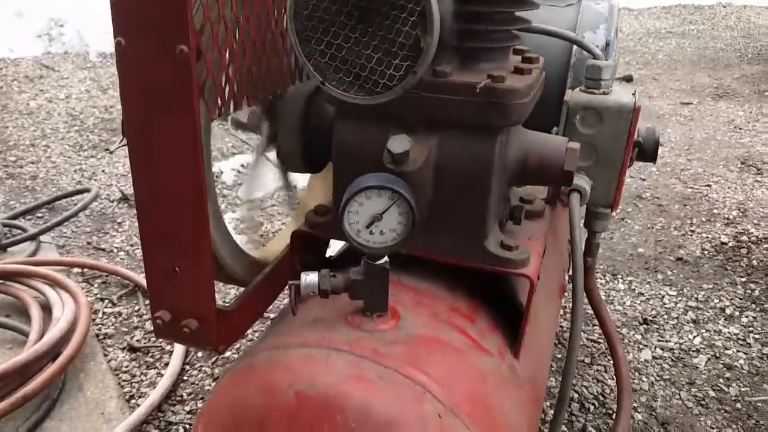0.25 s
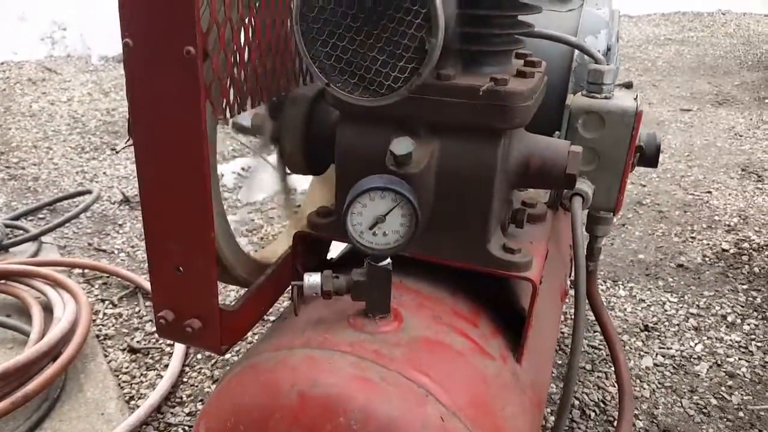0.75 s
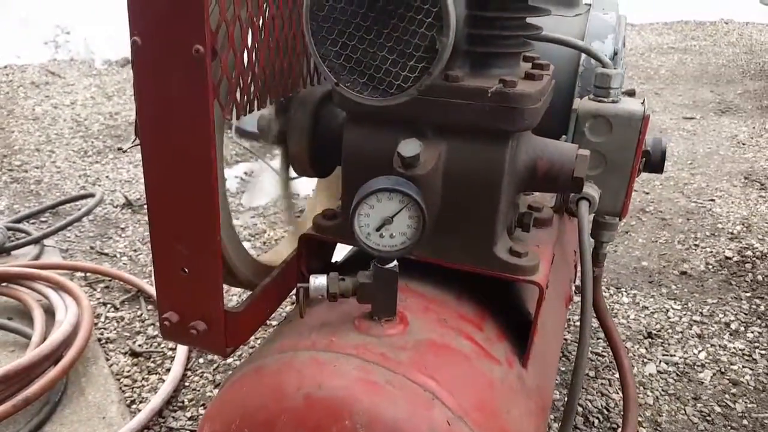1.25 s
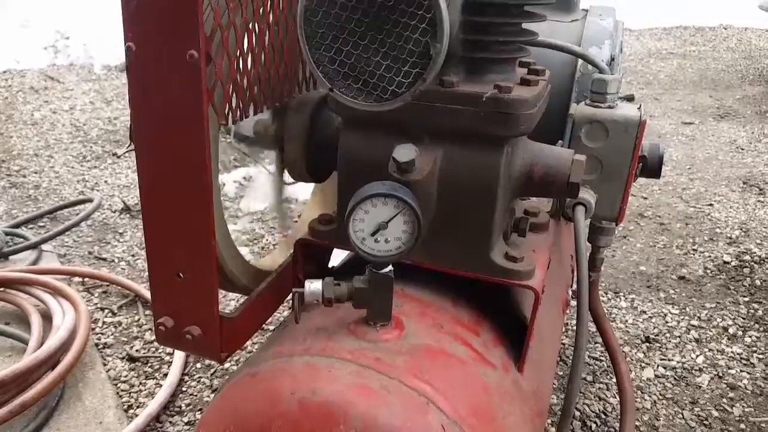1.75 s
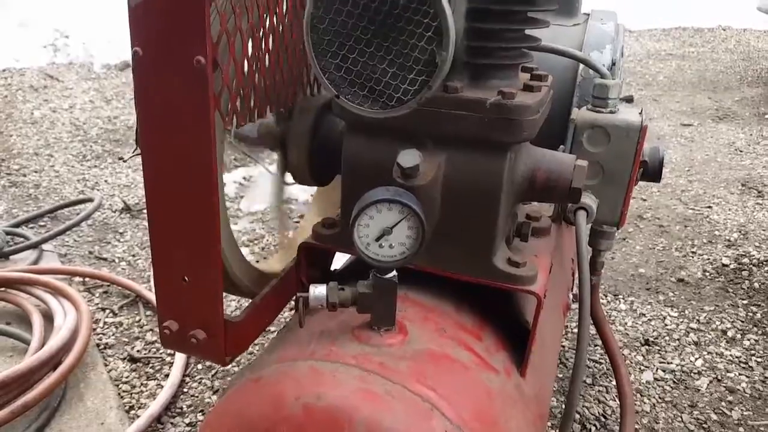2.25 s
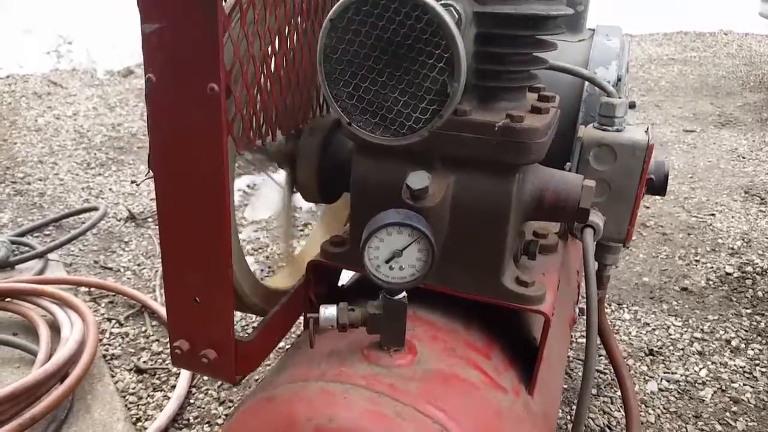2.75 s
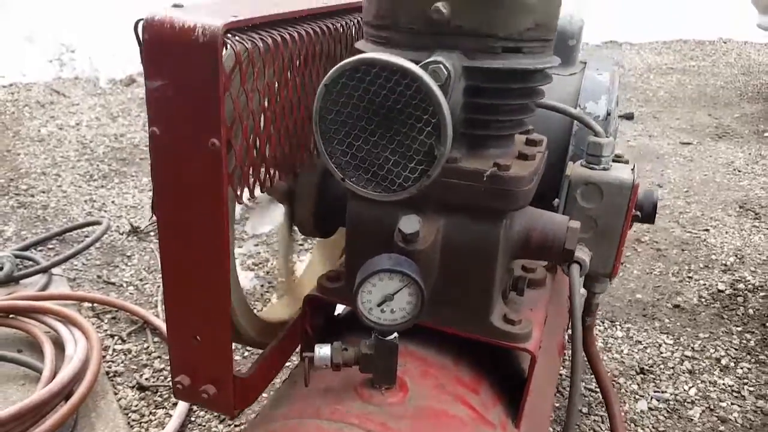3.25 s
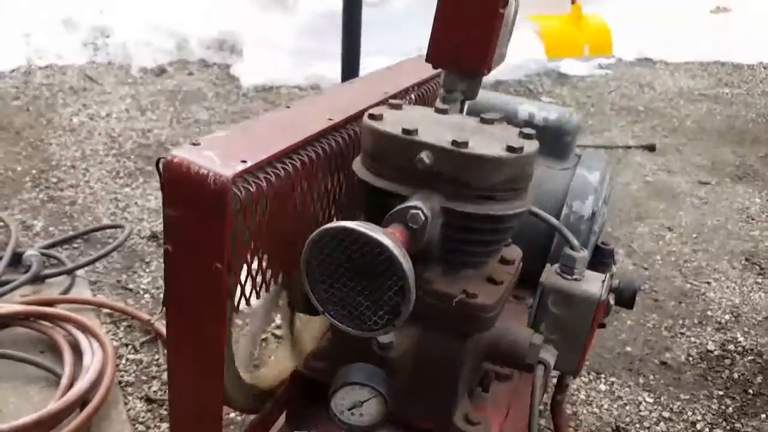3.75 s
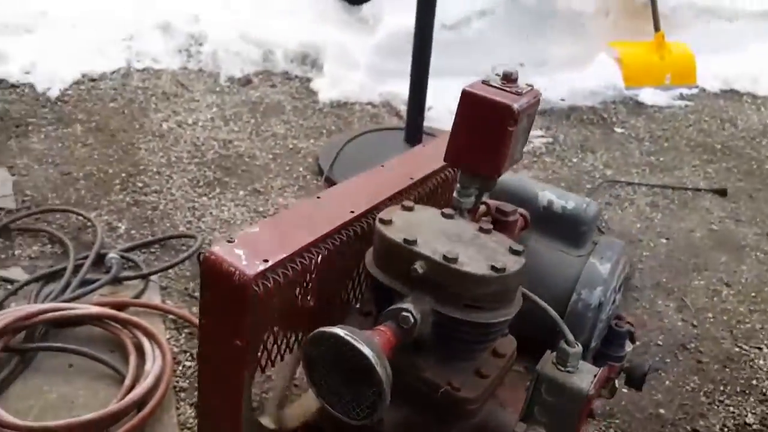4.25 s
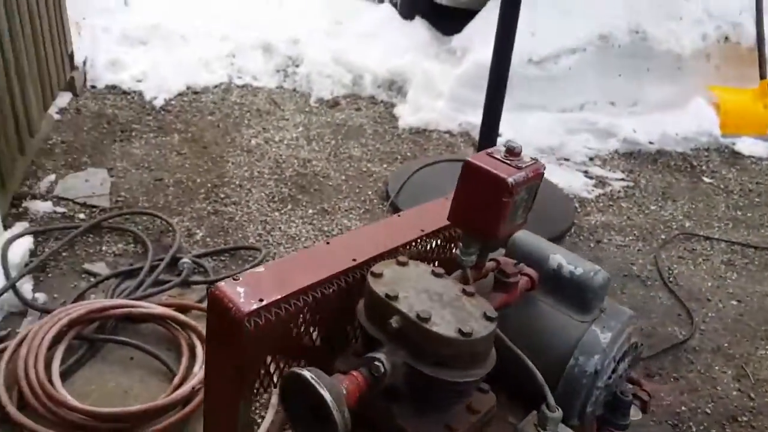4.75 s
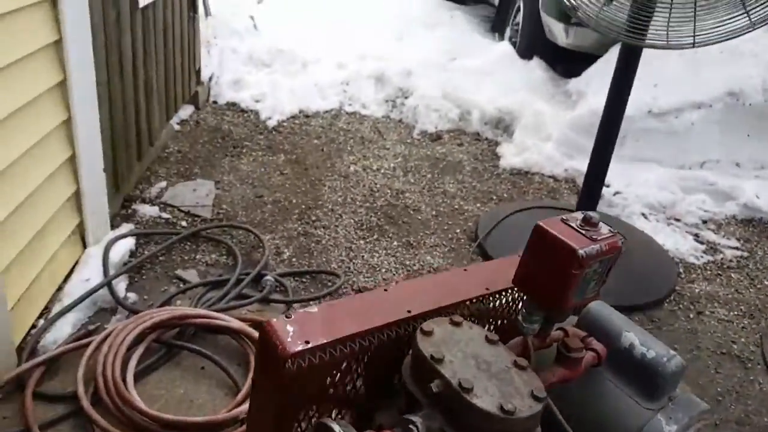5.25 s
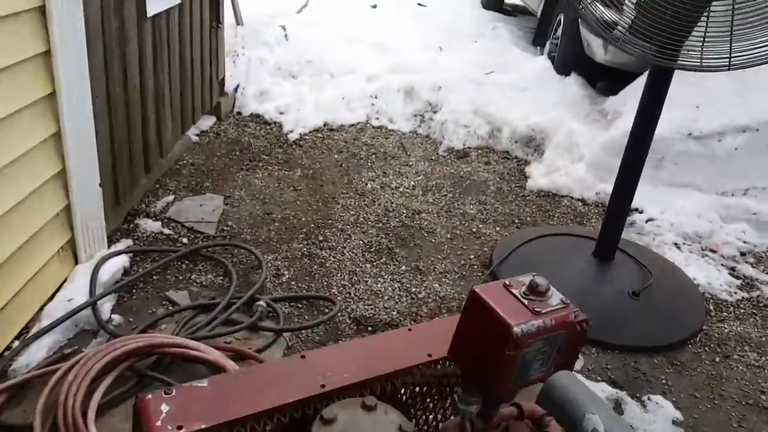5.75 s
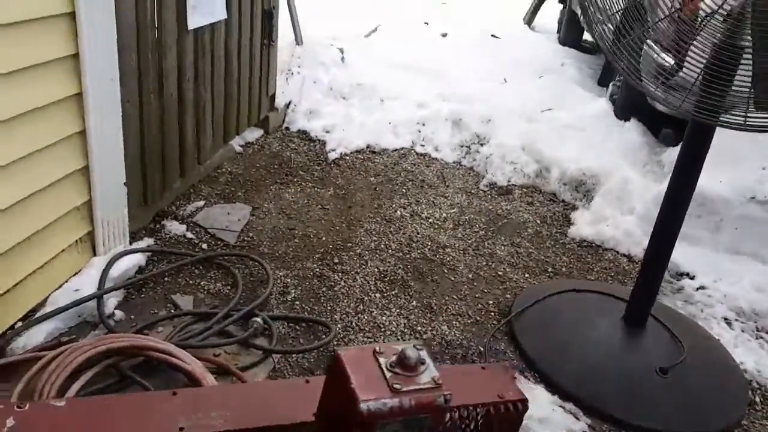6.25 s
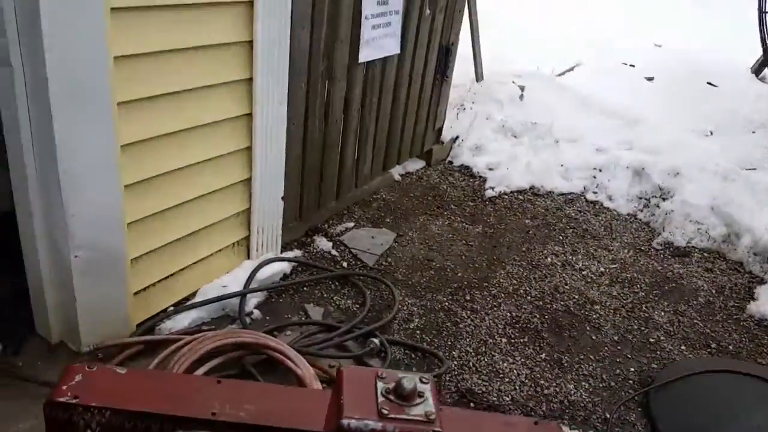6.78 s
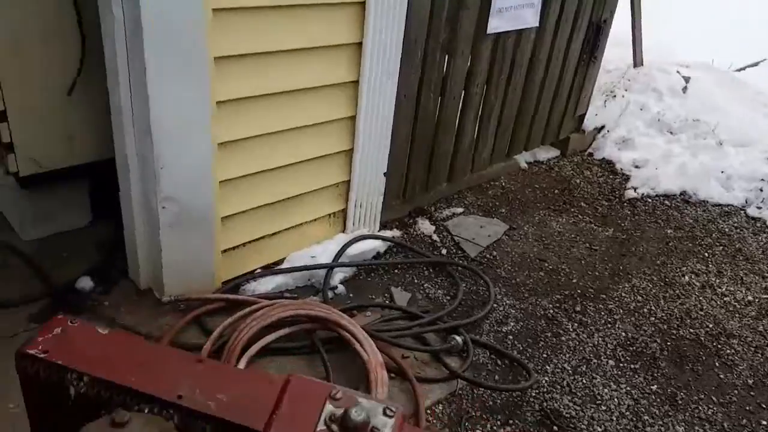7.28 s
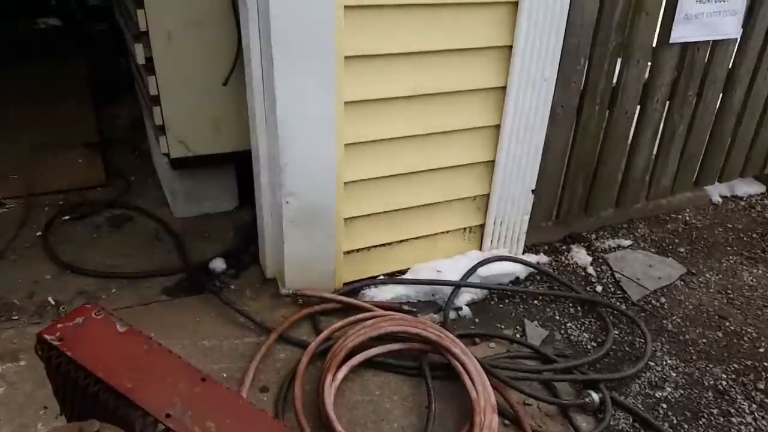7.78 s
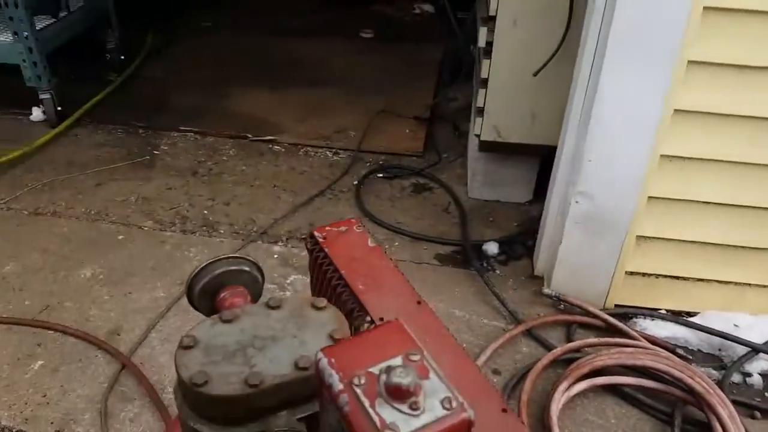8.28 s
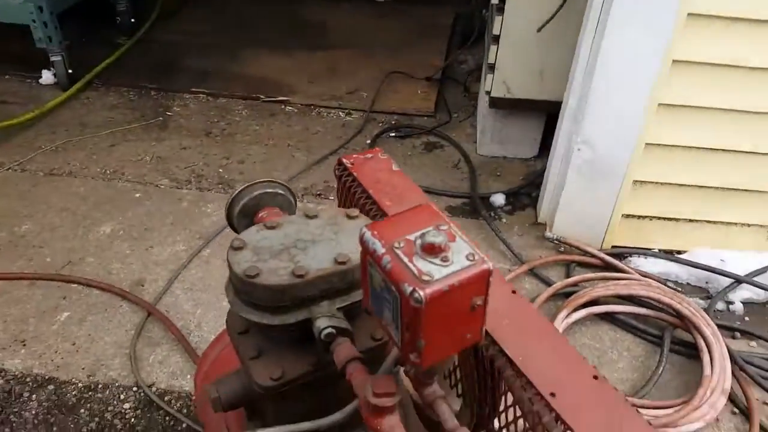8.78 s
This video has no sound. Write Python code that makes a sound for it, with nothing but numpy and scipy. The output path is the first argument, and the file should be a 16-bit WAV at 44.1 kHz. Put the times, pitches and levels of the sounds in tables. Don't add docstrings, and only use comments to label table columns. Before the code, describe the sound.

A two-cylinder belt-driven air compressor runs at an unchanging fast pace outdoors on gravel. Each intake stroke makes a low raspy flutter, about 24 a second, over ringing tank and guard steel and pulsing air hiss. A loose part ticks irregularly. Close stereo microphones circle the machine, so the buzz softens and the metallic colour shifts, with two soft footfalls in the second half.

```python
import sys
import numpy as np
from scipy import signal
from scipy.io import wavfile
from scipy.ndimage import uniform_filter1d

SR = 44100
rng = np.random.default_rng(int(sys.argv[2]) if len(sys.argv) > 2 else 0)


def store_pcm(level_fs):
    pcm = np.round(np.clip(level_fs, -1, 1) * 32767).astype(np.int16)
    wavfile.write(sys.argv[1], SR, np.atleast_2d(pcm).T)


def nominal_scale(level):
    x = np.asarray(level, float) / 20
    return 10 ** x


N = 397782

CRANK_PER_S, FIRST_STROKE_S = 11.9595, .0285

# flutter at valve opening f/Hz, glide/(Hz/s), level/dB, head start/flutter cycles
CYLINDERS = [(174, 450, -1, .43), (189.5, 130, 0, .365)]
# t after opening/s, level/dB
VALVE_LIFT = [(0, -22), (.0035, -6), (.014, 0), (.027, -1.5), (.034, -6), (.0415, -26)]
FADE_DB_PER_S = [40, 220, 400, 300]
# f/Hz, width/Hz, level/dB
TANK_FLANK_MODES = [(741, 3, 0), (963, 4, 2), (1006, 8, -6), (1045, 14, -3), (1157, 8, -6), (1050, 300, 1)]
# f/Hz, width/Hz, level/dB
TANK_TOP_MODES = [(1356, 5, -4), (1378, 6, -4), (1399, 4, 1), (1400, 120, -3), (1520, 70, -6),
                  (1640, 90, -3), (1771, 60, -8), (1927, 6, -6)]
# f/Hz, width/Hz, level/dB
GUARD_LOW_MODES = [(2164, 6, -1), (2128, 30, -3), (2195, 40, -3), (2660, 30, -5), (2756, 8, -7),
                   (2976, 25, -13)]
# f/Hz, width/Hz, level/dB
GUARD_HIGH_MODES = [(2305, 40, -6), (2391, 6, -2), (2435, 10, -5), (2460, 6, -1), (2524, 14, -5),
                    (2557, 8, -7), (2430, 110, 3)]
# f/Hz, width/Hz, level/dB
FIN_MODES = [(5600, 45, -6.5), (5935, 31, -4.5), (6235, 43, -1), (6507, 80, -0.5), (6134, 220, 2.5),
             (7310, 76, -8.5), (8010, 60, -11.5)]
# f/Hz, width/Hz, level/dB
HEAD_MODES = [(707, 4, -3), (600, 40, -2)]
# f/Hz, width/Hz, level/dB
SHEEN_MODES = [(12700, 350, -1), (15650, 200, -3), (13800, 900, 0)]
# f/Hz, level/(dB per Hz)
AIR_SPECTRUM = [(1650, -24), (2800, -2), (3050, 2), (3150, -5.5), (3310, -4.5), (4040, -4.5), (4360, -8),
                (5320, -10), (5600, -15), (7280, -40), (12300, -120)]
# f/Hz, level/(dB per Hz)
LEAK_SPECTRUM = [(3940, -50), (6700, 2), (6980, 0.5), (7890, -1.5), (9000, -7.5), (9620, -32), (10300, -50),
                 (13400, -61), (22000, -120)]
# f/Hz, level/(dB per Hz)
TOP_SPECTRUM = [(6060, -28), (10300, -6.5), (10700, -1.5), (12200, -2), (13100, -4), (14200, -9.5),
                (15700, -16)]
# f/Hz, level/(dB per Hz)
FRAME_SPECTRUM = [(25, -32), (60, -18), (110, -46), (300, 2.5), (620, -6.5), (860, -9.5), (1250, -4),
                  (1650, 1), (1850, -7), (2300, 4.3), (2850, -67), (3300, -16)]
# multiple of crank speed, level/dB
PISTON_SHAKE = [(4, -80), (5, -46), (6, -54), (8, -56), (10, -38)]
# t/s, ring level/dB, snap level/dB
TICKS = [(.378, -24.5, -34), (.8844, -27, -55), (0.9727, -25, -59), (1.1767, -26, -38), (1.3962, -28, -55),
         (1.6347, -23, -41), (1.8118, -26, -55), (2.0118, -29, -55), (2.3037, -24, -55), (2.393, -27, -55),
         (2.845, -27, -55), (3.15, -25, -55), (3.2286, -28, -55), (3.764, -23.5, -37), (4.2248, -27, -42),
         (4.6818, -27, -38), (4.9831, -23, -55), (5.0614, -25, -55), (5.2669, -24, -36), (5.685, -22, -33),
         (6.6468, -26, -37), (6.7351, -29, -43), (6.8229, -30, -55), (7.2779, -39, -36), (7.4395, -23, -34),
         (7.857, -21, -35), (8.4047, -25, -55), (8.7006, -17, -51), (8.7914, -25, -57), (8.992, -25, -37)]
# t/s, peak level/dB, f/Hz
FOOTFALLS = [
    (4.642, -25, 105),
    (6.16, -29, 65),
]
# t/s, inlet level/dB, ground echo delay/ms, turned away/0-1
WALK = [(0, -24.5, 2.045, 0), (2.4, -24.5, 2.05, 0), (3.3, -25, 1.98, 0.02), (3.7, -26.5, 2.07, 0.07),
        (4.2, -27, 2.48, 0), (4.5, -27.5, 2.47, 0.03), (4.8, -29, 2, 0.14), (5.1, -26.5, 2.31, 0.07),
        (5.4, -27, 2.22, 0.14), (6, -25, 2.45, 0.38), (6.3, -27, 2.45, .6), (6.6, -29.5, 2.08, 0.53),
        (6.9, -30.5, 2.02, 0.93), (7.2, -28.5, 2.06, 0.78), (7.8, -30, 2.2, 0.88), (8.1, -28.5, 2.24, 0.48),
        (8.4, -28, 1.9, 0.25), (9, -31, 1.64, 0.17)]
# t/s, flank level/dB, top level/dB, guard level/dB, guard left-right/dB, guard left lead/rad
FACING = [(0, 3.5, -0.5, 1.5, 3, -1), (1.8, -1, 0, 0.5, 1, -.9), (3.3, 2.5, 0, 1.5, 3.5, -1.3),
          (4.3, 0, 3.5, -2, 3, -1), (4.8, -1.5, 3.5, 2.5, 5, -0.3), (5.1, -11, -3, 2.5, 5, -2),
          (5.6, -2, 0.5, 6, -5, -2.5), (5.8, 2.5, 2.5, 1.5, 8, -3.5), (6.1, -1, 7, 8, -2, -7.5),
          (6.5, 2.5, 6, 8.5, -1, -5.5), (6.8, 3, 4.5, 9, 4, -6.5), (7, 1.5, 0, 12, -7, -5),
          (7.4, 5.5, 6, 2, 5, -5), (7.8, 3.5, 6.5, 9, 4, -2.5), (8, 9, 5, 2, -2, -4.5),
          (8.2, 5.5, 0.5, 8, 13, -3), (8.6, 3.5, -1.5, 6, -4.5, -2.5), (9, 2.5, 0.5, 7, 1, -2.5)]
# t/s, level/dB
FINS_IN_VIEW = [(0, -1), (3.6, -.5), (5.3, 1.5), (5.5, 5), (6.3, 2), (6.7, -1.5), (7.8, 0), (9, -0.5)]

BUZZ_DB, ECHO_GAIN, FLUTTER_HZ = [0.5, 5.5, -4, -18], 0.76, 186.3
INLET_PAN_DB, INLET_LEAD_MS = (1.5, 1.5), (0.12, 0.25)
# level/dB, added when turned away/dB, left-right/dB, left lead/rad, added when turned away/rad
TANK_FLANK_AT, TANK_TOP_AT = (-34, 1.5, 1, 0.03, 1.95), (-23.5, -3, 5.5, 0.96, 2.5)
GUARD_LOW_DB, GUARD_LOW_PAN_DB, GUARD_HIGH_DB = -24.5, 7, -23.5
OVER_EDGE_RAD, HIDDEN_DB_PER_RAD = 3.3, 4
# level/dB, added when turned away/dB, left-right/dB, added when turned away/dB
AIR_AT, FIN_AT = (-35, -1.5, 2, -1.5), (-33.5, 2.5, 5, 2.5)
LEAK_AT, TOP_AT = (-36.5, 0, 1.7, 4), (-52.5, 6, 6, 14)
AIR_RISE_DB_PER_S = 0.7
SHEEN_DB, SHEEN_FOLLOWS = -53.5, 2.8
VALVE_DB, FRAME_DB = -44, -23.5
STRANDS_DB = 2.5
TICK_PAN_DB, TICK_SCATTER_DB, FAINT_PER_S, FAINT_DB = 3, 11, 2.5, -34


def evened(x):
    return x / np.sqrt(np.mean(abs(x) ** 2) + 1e-20)


def curves(rows):
    s, *columns = np.transpose(rows)
    return [np.interp(np.arange(N) / SR, s, c) for c in columns]


def sides(pan_db):
    ratio = nominal_scale(pan_db) ** 2
    left = ratio / (1 + ratio)
    return np.sqrt(2 * np.array([left, 1 - left])).reshape(2, -1)


def wander(depth_db, per_s):
    t = np.arange(0, N + 512, 512) / SR
    rates_hz = np.geomspace(per_s / 15, per_s, 16)
    drift = sum(np.sin(2 * np.pi * (f * t + rng.random())) / np.sqrt(f) for f in rates_hz)
    return np.interp(np.arange(N) / SR, t, nominal_scale(depth_db * evened(drift)))


def since_stroke():
    strokes = (np.arange(N) / SR - FIRST_STROKE_S) * 2 * CRANK_PER_S + 2
    return strokes.astype(int), strokes % 1 / (2 * CRANK_PER_S)


def throb(depth_db, late_s):
    stroke, s = since_stroke()
    force = 1 + .35 * rng.standard_normal(stroke[-1] + 1)[stroke]
    return nominal_scale(depth_db * force * np.cos(4 * np.pi * CRANK_PER_S * (s - late_s)))


def clatter(repeat, same):
    place = (np.arange(N) % (SR / CRANK_PER_S)).astype(int)
    walk_rad_per_s = np.interp(np.arange(N) / SR, [0, 3, 4, 9], [0.087, 0.063, 0.89, 0.77])
    view = np.cumsum(walk_rad_per_s) / SR
    early, late = rng.standard_normal((2, 2, 4000))[:, :, place]
    recurring = np.cos(view) * early + np.sin(view) * late
    a, b = np.sqrt(repeat) * recurring + np.sqrt(1 - repeat) * rng.standard_normal((2, N))
    return np.array([a, same * a + np.sqrt(1 - same ** 2) * b])


def inlet_db():
    level_db, echo_ms, _ = curves(WALK)
    out = []
    for k, db in enumerate(BUZZ_DB, 1):
        echo = ECHO_GAIN * np.exp(2j * np.pi * FLUTTER_HZ * k * echo_ms / 1000)
        out.append(level_db + db + 20 * np.log10(abs(1 - echo)))
    return out


def placed(level_db, away_db, pan_db, away_pan_db):
    away = curves(WALK)[2]
    return level_db + away_db * away, pan_db + away_pan_db * away


def later_right(x):
    lead_ms = INLET_LEAD_MS[0] + INLET_LEAD_MS[1] * curves(WALK)[2]
    return np.array([x[0], np.interp(np.arange(N) - lead_ms * SR / 1000, np.arange(N), x[1])])


def ring(modes, level_db, pan_db, lead, force, drift_db):
    out = np.zeros((2, N), complex)
    for hz, width, db in modes:
        widths = np.array([width, 4 * width + 150])
        poles = np.exp((2j * np.pi * hz - np.pi * widths) / SR)
        mode = signal.lfilter([1], np.poly(poles), force)
        drift = np.array([wander(drift_db, 2.5), wander(drift_db, 2.5)])
        out += nominal_scale(db) * drift * evened(mode)
    out[1] *= np.exp(-1j * lead)
    rms = np.sqrt(np.mean(out.real ** 2, 1, keepdims=True))
    return nominal_scale(level_db) * sides(pan_db) * out.real / rms


def noise(points, force, patchy_db):
    hz, t, z = signal.stft(force, SR, nperseg=1024, noverlap=768)
    patches = uniform_filter1d(rng.standard_normal((len(t), 513)).T, 10, 0)
    patches = evened(uniform_filter1d(patches, 12, 1))
    strands = uniform_filter1d(rng.standard_normal((len(t), 513, 2)).T, size=3, axis=1)
    strands = evened(uniform_filter1d(strands, size=250, axis=2))
    f, db = np.transpose(points)
    shape_db = np.interp(np.log(hz + 1), np.log(f + 1), db, -90, -90)
    z = z * nominal_scale(shape_db[:, None] + patchy_db * patches + STRANDS_DB * strands)
    return evened(signal.istft(z, nperseg=1024, noverlap=768)[1][:, :N])


def filter_sheen():
    level_db = SHEEN_DB + SHEEN_FOLLOWS * (curves(WALK)[0] - WALK[0][1])
    return ring(SHEEN_MODES, level_db, 2.5, 0.6, clatter(.1, 0.46) * throb(2.5, 0.015), 1.2)


def hiss():
    air_db, air_pan = placed(*AIR_AT)
    leak_db, leak_pan = placed(*LEAK_AT)
    top_db, top_pan = placed(*TOP_AT)
    air_db = air_db + AIR_RISE_DB_PER_S * np.arange(N) / SR
    air = noise(AIR_SPECTRUM, clatter(0.11, 0.068), 1.78) * throb(0.62, 0.022)
    leak = noise(LEAK_SPECTRUM, clatter(0.088, 0.044), 1.9) * throb(0.89, 0.03)
    top = noise(TOP_SPECTRUM, clatter(.08, .4), 1.4) * throb(2.2, .012)
    out = nominal_scale(air_db) * sides(air_pan) * air + nominal_scale(leak_db) * sides(leak_pan) * leak
    return out + nominal_scale(top_db) * sides(top_pan) * top + filter_sheen()


def frame():
    level_db = inlet_db()[0]
    near_db = level_db - level_db[0]
    turns = np.arange(N) / SR * CRANK_PER_S
    shake = sum(nominal_scale(db) * wander(1.2, 4.0) * np.sin(2 * np.pi * (k * turns + rng.random()))
                for k, db in PISTON_SHAKE)
    rattle = later_right(noise(FRAME_SPECTRUM, clatter(0.88, 0.75), 1.3)) * throb(3.2, 0.01)
    return nominal_scale(FRAME_DB + 0.24 * near_db) * rattle + shake * nominal_scale(1.4 * near_db) * sides(2.5)


def add(mix, s, sound):
    part = mix[:, round(s * SR):][:, :sound.shape[1]]
    part += sound[:, :part.shape[1]]


def footfalls():
    out, t = np.zeros((2, N)), np.arange(5000) / SR
    for s, db, hz in FOOTFALLS:
        thud = np.sin(2 * np.pi * hz * t) * np.hanning(5000) * np.exp(-t / 0.084)
        add(out, s, np.ones((2, 1)) * nominal_scale(db) * thud)
    return out


def loose_part():
    out, t = np.zeros((2, N)), np.arange(5000) / SR
    bright = signal.butter(2, [12000, 15000], "band", fs=SR, output="sos")
    snap_pan = placed(*TOP_AT)[1]
    faint_s = np.cumsum(rng.exponential(1, size=60)) / FAINT_PER_S
    faint = [(s, FAINT_DB, -90) for s in faint_s if s < N / SR]
    body = .7 * nominal_scale(-60 * t / .03) + .35 * nominal_scale(-60 * t / .1)
    for s, db, snap_db in list(TICKS) + faint:
        phase = np.array([[0], [0.25 + 0.25 * rng.random()]])
        pan_db = TICK_PAN_DB + TICK_SCATTER_DB * rng.standard_normal()
        tick = np.sin(2 * np.pi * (3960 * t + phase)) * body
        tick += np.sin(2 * np.pi * (3960 * t + phase / 2)) * nominal_scale(-60 * t / .006)
        add(out, s, nominal_scale(db + 4) * tick * sides(pan_db))
        snap = signal.sosfilt(bright, rng.standard_normal((2, 5000))) * nominal_scale(snap_db + 14.0 - 60 * t / 0.013)
        add(out, s, snap * sides(snap_pan[int(s * SR)]))
    return out


def fins():
    level_db, pan_db = placed(*FIN_AT)
    level_db = level_db + curves(FINS_IN_VIEW)[0]
    lead = 2.82 + 3.07 * curves(FACING)[4]
    return ring(FIN_MODES, level_db, pan_db, lead, clatter(0.08, 0.33) * throb(0.73, 0.023), 2.0)


def guard():
    _, _, faced_db, pan_db, lead = curves(FACING)
    low_db = GUARD_LOW_DB - HIDDEN_DB_PER_RAD * np.maximum(-lead - OVER_EDGE_RAD, 0)
    low_force = clatter(0.46, 0.63) * throb(1.3, 0.021)
    high_force = clatter(0.19, 0.89) * throb(1.04, 0.025)
    out = ring(GUARD_LOW_MODES, low_db, GUARD_LOW_PAN_DB, lead, low_force, 0.61)
    return out + ring(GUARD_HIGH_MODES, GUARD_HIGH_DB + faced_db, pan_db, lead, high_force, 0.59)


def tank_and_head():
    away, (flank_db, top_db, *_) = curves(WALK)[2], curves(FACING)
    (flank, top) = [(db + faced_db + away_db * away, pan_db, rad + more * away)
                    for faced_db, (db, away_db, pan_db, rad, more)
                    in ((flank_db, TANK_FLANK_AT), (top_db, TANK_TOP_AT))]
    out = ring(TANK_FLANK_MODES, *flank, clatter(0.74, 0.72) * throb(2.2, 0.013), 1.0)
    out += ring(TANK_TOP_MODES, *top, clatter(0.27, 0.35) * throb(2.0, 0.025), 1.0)
    head_db = np.interp(np.arange(N) / SR, [0, 3.5, 5, 7, 9], [-35.5, -38, -32.5, -27.5, -37.5])
    return out + ring(HEAD_MODES, head_db, flank[1], 0.38 * flank[2], clatter(0.87, 0.9), 0.52)


def valve_plate():
    level_db = VALVE_DB + curves(WALK)[0] - WALK[0][1]
    modes = [(7610, 98, 0)]  # f/Hz, width/Hz, level/dB
    return ring(modes, level_db, 6.0, 1.6, clatter(.3, .4) * throb(5.5, 0.017), 1.3)


def intake():
    levels_db, away = inlet_db(), curves(WALK)[2]
    pan_db, lead_ms = [facing + more * away for facing, more in (INLET_PAN_DB, INLET_LEAD_MS)]
    stroke, s = since_stroke()
    start_hz, glide, cylinder_db, head_start = np.array(CYLINDERS)[stroke % 2].T
    slip, *strength = rng.standard_normal((stroke[-1] + 1, 5))[stroke].T
    behind_db_per_s = 25 * np.maximum(levels_db[0][0] - levels_db[0], 0)
    lift_db = np.interp(s, *np.transpose(VALVE_LIFT)) + cylinder_db
    turns = start_hz * s + glide * s ** 2 / 2 + .012 * slip + head_start
    turns = np.array([turns, turns - start_hz * lead_ms / 1000])
    out = 0
    for k, (level_db, fade) in enumerate(zip(levels_db, FADE_DB_PER_S)):
        late_s = np.maximum(s - .018 + .003 * k, 0)
        shape = nominal_scale(lift_db - (fade + behind_db_per_s) * late_s + (.4 + .2 * k) * strength[k])
        partial = uniform_filter1d(shape, 90) * np.sin(2 * np.pi * (k + 1) * turns)
        out = out + nominal_scale(level_db) * evened(partial)
    return out * sides(pan_db)


def scene():
    steel = fins() + guard() + tank_and_head() + valve_plate()
    return hiss() + frame() + footfalls() + loose_part() + steel + intake()


def band_limit(x):
    return signal.sosfilt(signal.butter(12, 15880, fs=SR, output="sos"), x)


def record(dry):
    limited = np.tanh(dry / 1.5) * 1.5
    hz, t, z = signal.stft(limited, SR, nperseg=1024, noverlap=768)
    band, block = np.arange(513) // 10, np.arange(len(t)) // 4
    power = np.add.reduceat((abs(z) ** 2).mean(0), np.arange(0, 513, 10))
    held = uniform_filter1d(power, size=5)[:, block * 4]
    whim_db = 3.2 * rng.standard_normal((len(t), 52)).T[:, block]
    limit_db = np.interp(hz, [9800, 10500, 13000, 14500, 15000, 15400], [-62, -65, -66, -70, -71, -70])
    passes = held[band] > nominal_scale(limit_db[:, None] + whim_db[band]) ** 2
    z = z * (passes | (hz[:, None] < 3000))
    return band_limit(signal.istft(z, nperseg=1024, noverlap=768)[1][:, :N])


dry = scene()
out = record(dry)
store_pcm(out)
```